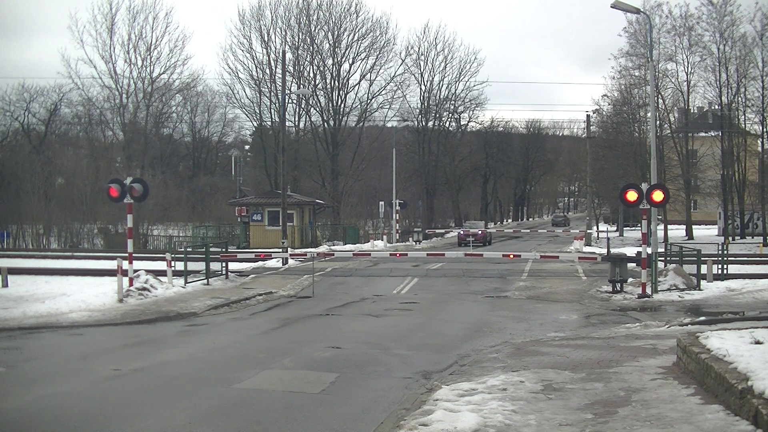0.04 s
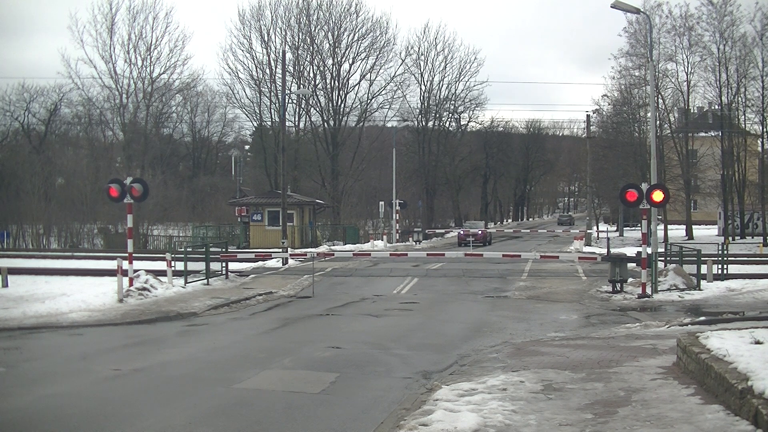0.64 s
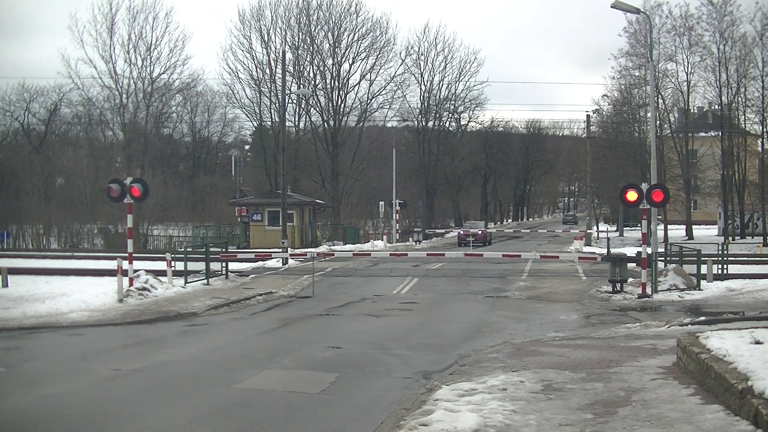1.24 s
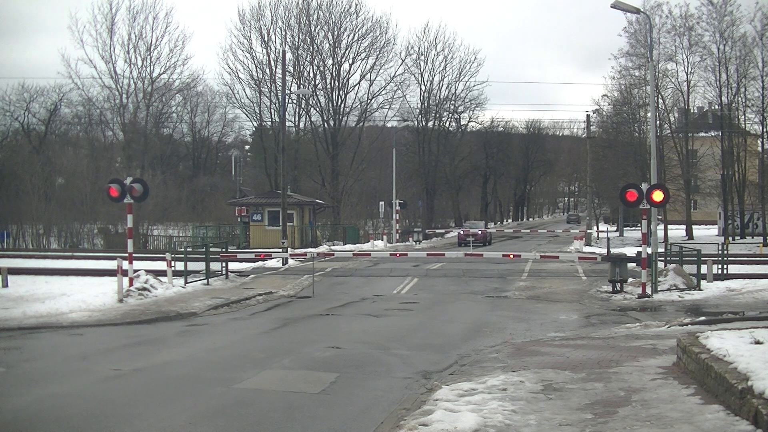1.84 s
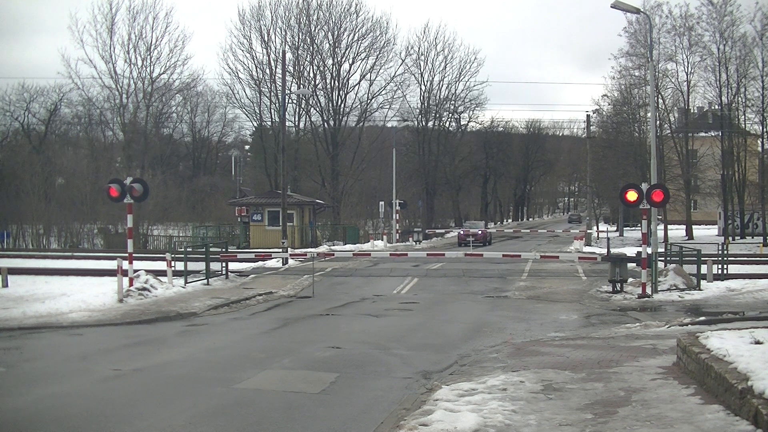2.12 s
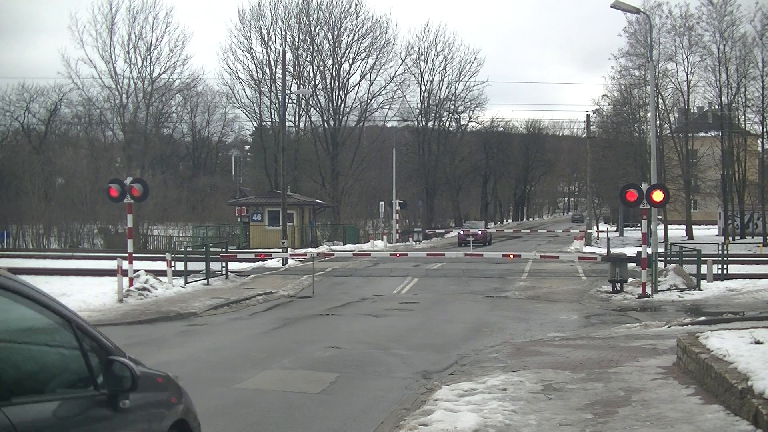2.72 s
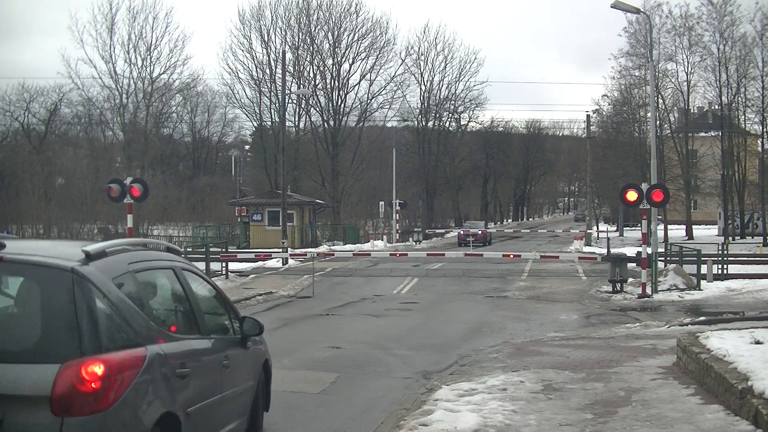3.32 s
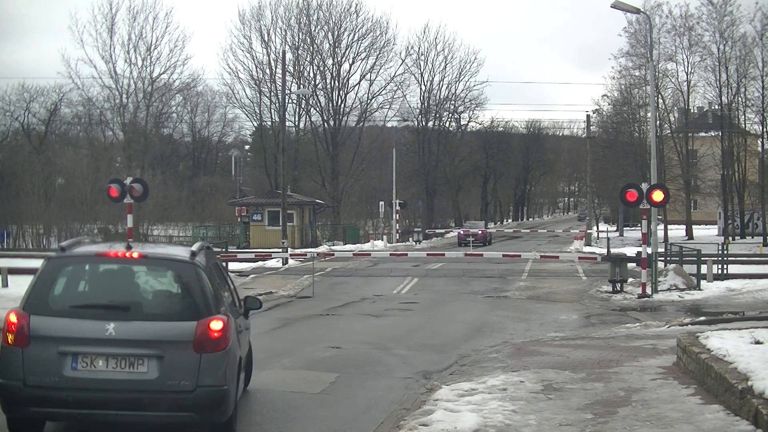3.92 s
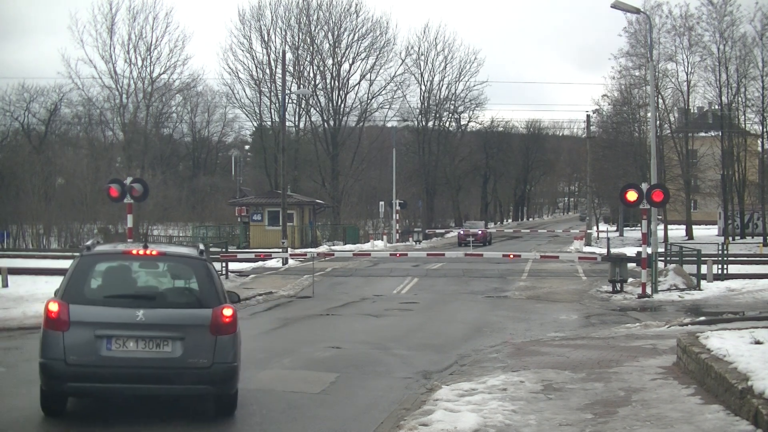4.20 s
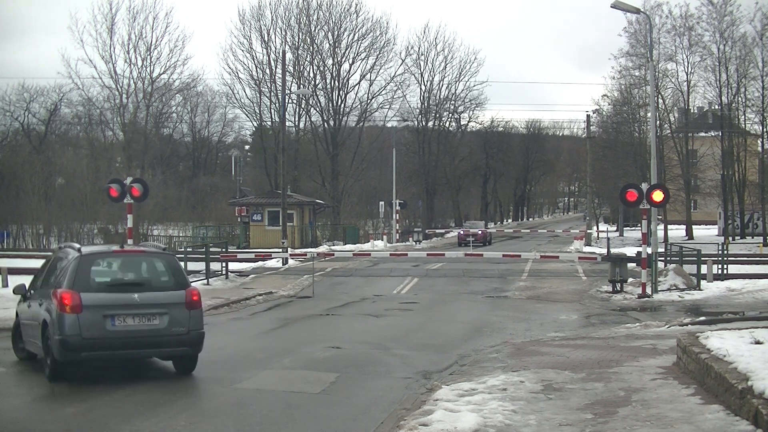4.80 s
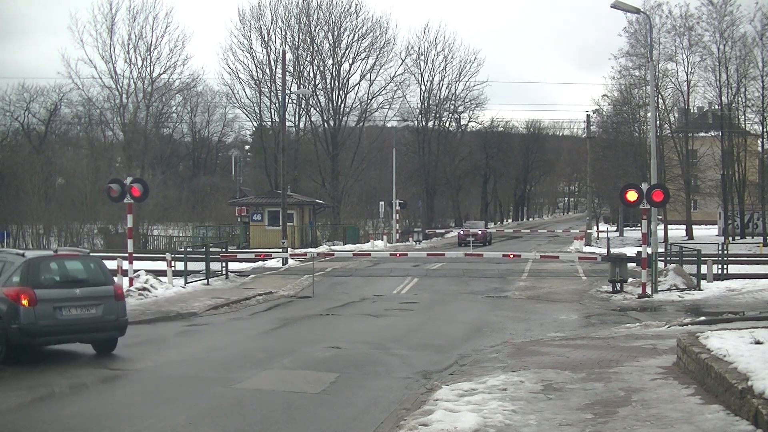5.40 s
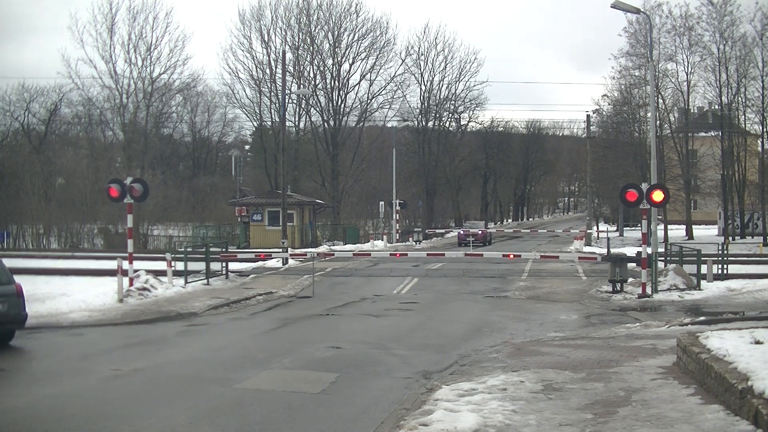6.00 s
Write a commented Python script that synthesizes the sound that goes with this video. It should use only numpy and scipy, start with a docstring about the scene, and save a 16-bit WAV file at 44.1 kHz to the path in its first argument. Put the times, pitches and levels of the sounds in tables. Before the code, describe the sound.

A car approaches from behind on a wet road outdoors, its tyres hissing over a low rumble from the rough asphalt. A faint engine hum sinks in pitch from about half a second. The hiss and fluttering spray swell as the car passes close on the left at around 2 seconds, with a few sharp snaps of grit just afterwards. A hollow tone within the tyre noise falls until about 3.2 seconds, then rises slightly as the car slows and turns away ahead. A wheel slaps through slush at about 3.4 seconds and more softly at 4.1, where more grit cracks. A few faint, high drips tick nearby between 1.7 and 3.2 seconds. The tyre hiss carries on more quietly with scattered small clicks, and near 5.9 seconds comes a sharper snap with a quick cluster of slushy splashes.

```python
"""Tyres roar, hiss and fling spray on a wet road as a car comes from behind, passes close on the left,
slows and turns away ahead. Rough asphalt shakes the tyres, the tread throws off water, and the horn
between tread and road resonates ever lower, then rises a little. Beneath this the engine runs down,
grit snaps, a wheel slaps through slush and a few drops land nearby. The microphone's housing
colours the sound differently from each direction."""
import sys
import numpy as np
from scipy import signal
from scipy.fft import rfft, irfft, next_fast_len
from scipy.io import wavfile
from scipy.ndimage import map_coordinates

SR = 44100
rng = np.random.default_rng(int(sys.argv[2]) if len(sys.argv) > 2 else 0)


def generate_wav(sig):
    """Save sig (samples, or channels by samples) to the path in sys.argv[1] as 16-bit PCM at SR."""
    pcm = np.round(np.clip(np.atleast_2d(sig).T, -1, 1) * 32767).astype(np.int16)
    wavfile.write(sys.argv[1], SR, pcm)


N = 271611

# exhaust hum envelope: time_s, level_db
HUM_LEVEL = [(0, -78), (.25, -71), (.55, -68), (1.02, -75), (1.65, -67), (2.05, -75), (2.7, -98)]
# partials of the exhaust and of the belt-driven parts: firing_multiple, relative_db
HUM_ORDERS = [(1, 4), (2, -9), (3, -2), (4, -1), (5, 3), (6, 4)]
BELT_ORDERS = [(3.93, -1), (4.8, 0), (7.43, -1.5)]
# drops landing nearby: start_s, relative_db, pitch_hz, t60_s
DRIP_TICKS = [(1.725, -27, 12200, .03), (2.705, -28, 12600, 0.053), (3.046, -28, 13400, 0.043),
              (3.236, -24, 9100, .012)]
# stones snapping under the tread: start_s, relative_db, pitch_hz
GRIT_SNAPS = [(.881, -23, 1600), (2.279, -19, 2900), (2.348, -17, 2400), (2.458, -19, 3000),
              (3.046, -23, 1950), (3.206, -21, 2300), (3.411, -17, 3000), (4.1295, -13, 3200),
              (4.1423, -19, 3200), (4.1505, -17, 3100), (4.830, -24, 2600), (4.866, -20, 3800),
              (4.9465, -21, 2700), (5.259, -25, 3900), (5.8835, -17, 3000), (5.8858, -14, 4000)]
# slaps through slush: start_s, level_db, t60_s, brightness_db_per_octave
SLUSH_SLAPS = [(3.377, -28, 0.36, 0), (4.13, -41, 0.097, -4), (4.144, -35, 0.11, -3),
               (5.883, -22, 0.2, 0.5), (5.925, -31, 0.31, -1), (5.957, -28.5, 0.13, -2),
               (5.969, -32, 0.73, -4), (6.077, -30.5, 0.1, -2.5)]
# spectrum of flung slush and stone fragments: frequency_hz, density_db
SPATTER_SPECTRUM = [(40, -60), (150, -22), (450, -16.5), (900, 0.5), (2200, 6), (4200, 10), (5500, -4),
                    (7600, -5), (9500, -16), (11000, -20), (15500, -32)]
# tyre spectrum from each bearing: frequency_hz, density_db
SPECTRUM_BEHIND = [(30, -39), (105, -19), (140, -14), (200, -7.5), (280, 0.5), (390, -4.5), (580, -3),
                   (850, 0.5), (1080, -5), (1500, -1), (2200, 0), (3700, 1), (4600, -3.5), (5600, -5.5),
                   (6500, -9), (7350, -13), (8500, -13.5), (9800, -19.5), (10800, -23), (15500, -31)]
SPECTRUM_BESIDE = [(30, -43), (100, -26), (170, -19), (580, -12.5), (900, -9), (1250, 0.1), (2300, 9),
                   (4100, 2), (4550, -6), (5500, -3), (6700, -7.5), (8000, -17), (9900, -18.5),
                   (10800, -29), (12800, -23.5), (15500, -33)]
SPECTRUM_AHEAD = [(30, -29), (120, -27), (170, -17), (280, -15), (400, -19), (620, -10.5), (1180, -5.5),
                  (1600, -4.5), (2200, 0.5), (3100, -3.5), (4200, 1.5), (4750, -7), (5600, -6.5),
                  (7000, -8.5), (8600, -18), (9800, -17.5), (10900, -27.5), (15500, -30.5)]
# likeness of left and right from each bearing: frequency_hz, coherence
COHERENCE_BEHIND = [(100, 0.95), (400, 0.98), (1150, 1), (2000, 0.48), (3400, 0.32), (5300, 0.29),
                    (6500, 0.5), (9500, 0.57), (11000, 0.22)]
COHERENCE_BESIDE = [(100, .93), (300, .98), (900, .975), (1500, .992), (3300, .965), (5000, .75),
                    (8000, .78), (11000, .6), (15000, .6)]
COHERENCE_AHEAD = [(100, .65), (300, .82), (750, .97), (1300, .995), (2600, .99), (4100, .96), (5200, .45),
                   (6800, .77), (9700, .68), (11000, .15)]
# shading by the housing from each bearing: frequency_hz, left_minus_right_db
BALANCE_BEHIND = [(100, -3), (300, -1.5), (1600, -4.5), (3400, 6), (4600, 2.5), (5500, 5.5), (8400, 8),
                  (9900, -8), (11500, 6), (14000, 2)]
BALANCE_BESIDE = [(300, -1.5), (1500, -.4), (4000, 0), (5000, 2), (6700, 4.5), (8200, 0), (9700, -6),
                  (11200, 0), (14000, -2)]
BALANCE_AHEAD = [(300, -1.5), (1500, -.4), (3000, -.3), (4500, -1.5), (5100, -3), (6000, 3), (7200, 5),
                 (8300, 0), (9700, -7), (11300, -1.5), (14000, -4)]
# phase between the ports from each bearing: frequency_hz, left_lead_rad
PHASE_BEHIND = [(100, 0), (1100, .1), (2800, 1), (4500, .3), (5200, 1.6), (5700, -.6), (6400, .1),
                (9500, -.4), (10800, 2)]
PHASE_BESIDE = [(1000, 0), (4100, .25), (4600, .9), (5400, 1), (7100, -.1), (8300, -.5), (9900, .3),
                (10700, 1.1), (13000, .7)]
PHASE_AHEAD = [(2000, 0), (4700, .1), (5350, 1.1), (6000, .55), (8400, -1), (10000, -.3), (11300, 1.5)]
# resonance between tread and road as the car slows and turns: time_s, centre_hz, boost_db
HORN_RESONANCE = [(0, 3260, 0), (1.0, 3100, 2), (1.7, 2860, 3), (2.55, 2240, -0.5), (3.2, 1470, 4),
                  (3.55, 1760, 4), (3.95, 1900, 1), (4.501, 1950, -1.9), (6.16, 2100, -1.5)]
# notches cut by reflections: behind_hz, ahead_hz, midway_m, glide_m, depth_db, deepest_m, fade_m
REFLECTION_NOTCHES = [(10050, 4040, 0.14, 1.1, 6, -0.34, 1.53), (2300, 590, 0.37, 2.2, 3, 0.46, 5)]
# wetter (+) and drier (-) patches of road: middle_s, half_length_s, gain_db
ROAD_WETNESS = [(.38, 0.11, 1), (.93, 0.18, 1), (2.236, 0.008, 3), (2.282, 0.0059, 2.5), (2.35, .02, 2.5),
                (3.41, 0.027, -1), (4.14, .025, 3), (4.24, 0.1, -1), (4.53, 0.08, -2), (4.79, .07, 1.5),
                (4.95, .025, 2), (5.14, 0.033, 2.5), (5.24, 0.034, -1), (5.6, 0.025, 2)]
# rougher (+) and smoother (-) patches of asphalt: middle_s, half_length_s, gain_db
ROAD_ROUGHNESS = [(.85, 0.38, 3), (1.65, 0.032, 0.5), (2.43, .06, 2.5), (2.87, 0.085, -3.5), (3.15, 1, 4),
                  (4.58, 0.037, -3.5), (5.34, 0.043, 4.5)]

START_M_PER_S, END_M_PER_S = 8, 2.14
BRAKED_S, ABREAST_S = 3.58, 2.035  # braking ends; the car is closest
TIME_S = np.arange(N) / SR


def amp(db):
    """Decibels to amplitude ratio."""
    return 10 ** (np.asarray(db) / 20)


def unit(x):
    """Normalisation to rms 1."""
    return x / np.sqrt(np.mean(x ** 2) + 1e-20)


def bell(x, width):
    """A Gaussian of height 1 around x = 0."""
    return np.exp(-(x / width) ** 2)


def along(points, hz):
    """Interpolation on a logarithmic frequency axis."""
    knots_hz, values = np.transpose(points)
    return np.interp(np.log(hz + 1), np.log(knots_hz + 1), values)


def wobble(rate_hz):
    """Random modulation: a spline through rate_hz knots a second."""
    return map_coordinates(rng.standard_normal(int(N * rate_hz / SR) + 4), [TIME_S * rate_hz])


def filtered(x, response):
    """Linear filtering: the spectrum of x times a frequency response."""
    size = next_fast_len(x.shape[-1] + SR // 8)
    return irfft(rfft(x, size) * response(np.fft.rfftfreq(size, 1 / SR)), size)[..., :x.shape[-1]]


def add(track, start_s, sound):
    """Superposition of a sound on a track."""
    part = track[..., round(start_s * SR):][..., :sound.shape[-1]]
    part += sound[..., :part.shape[-1]]


def drive():
    """Uniform deceleration, then steady rolling: speed in m/s and metres past the microphone."""
    speed = np.interp(TIME_S, [0, BRAKED_S], [START_M_PER_S, END_M_PER_S])
    travelled_m = np.cumsum(speed) / SR
    return speed, travelled_m - np.interp(ABREAST_S, TIME_S, travelled_m)


def pass_by(near_db, fall_db, rear_db, side_m):
    """Spreading and directivity: fall_db less per doubling of distance, rear_db more towards the tail."""
    _, past_m = drive()
    distance_m = np.hypot(past_m, side_m)
    return near_db - fall_db * np.log2(distance_m / side_m) + rear_db * past_m / distance_m


def bearing_weights():
    """Linear crossfade with position: the shares heard from behind, beside and ahead."""
    _, past_m = drive()
    bearing = np.interp(past_m, [-2.2, 1.8, 7.5], [.18, 1, 2])  # 0 behind, 1 beside, 2 ahead
    return [np.maximum(1 - abs(bearing - k), 0) for k in range(3)]


def ports(hz, coherence, balance, phase):
    """Partial coherence: gains of direct and scattered sound at the two microphone ports."""
    angle = np.arccos(np.clip(along(coherence, hz), 0, 1)) / 2
    side = np.array([[1], [-1]])
    shade = amp(side * along(balance, hz) / 2) * np.exp(.5j * side * along(phase, hz))
    shade /= np.abs(shade).mean(0)
    return shade * np.cos(angle), shade * side * np.sin(angle)


def partials(orders, phase):
    """Additive synthesis: sines at multiples of one phase, each wavering in level."""
    return sum(amp(db + 2.3 * wobble(6)) * np.sin(multiple * phase + rng.uniform(0, 2 * np.pi))
               for multiple, db in orders)


def engine(start_hz, lift_s, sag_hz_per_s):
    """Periodic firing: exhaust hum and belt whine sink together once the throttle is lifted."""
    firing_hz = np.clip(start_hz - sag_hz_per_s * (TIME_S - lift_s), start_hz / 2, start_hz)
    phase = 2 * np.pi * np.cumsum(firing_hz * (1 + .0031 * wobble(9.1))) / SR
    hum_db = np.interp(TIME_S, *np.transpose(HUM_LEVEL))
    belt_db = pass_by(near_db=-66, fall_db=.5, rear_db=-9.5, side_m=.81)
    return amp(hum_db) * partials(HUM_ORDERS, phase) + amp(belt_db) * partials(BELT_ORDERS, phase)


def drips(width_hz, gain_db):
    """Drop impact: thin, high ticks of narrow-band noise that decay exponentially."""
    out, t = np.zeros((2, N)), np.arange(SR // 12) / SR
    for start_s, db, pitch_hz, t60_s in DRIP_TICKS:
        ring = filtered(rng.standard_normal((2, len(t))), lambda hz: bell(hz - pitch_hz, width_hz))
        add(out, start_s, unit(ring) * amp(db + gain_db - 60 * t / t60_s))
    return out


def grit(cycles, scatter_db, scatter_t60_s, low_hz):
    """Damped transients: each stone snaps and scatters fragments, too small to radiate bass."""
    out, t = np.zeros(N), np.arange(SR // 16) / SR
    for start_s, db, pitch_hz in GRIT_SNAPS:
        snap = np.sin(2 * np.pi * pitch_hz * t) * t * np.exp(-t * pitch_hz / cycles)
        noise = filtered(rng.standard_normal(len(t)), lambda hz: amp(along(SPATTER_SPECTRUM, hz)))
        fragments = unit(noise) * amp(scatter_db - 60 * t / scatter_t60_s)
        add(out, start_s, amp(db) * (snap / abs(snap).max() + fragments))
    return signal.sosfilt(signal.butter(2, low_hz, "high", fs=SR, output="sos"), out)


def slush(attack_s, spread_db):
    """Incoherent summation: each slap of a wheel raises a sudden cloud of drops that dies away."""
    out, t = np.zeros((2, N)), np.arange(SR // 3) / SR
    image = lambda hz: np.array(ports(hz, COHERENCE_AHEAD, BALANCE_AHEAD, PHASE_AHEAD))
    for start_s, db, t60_s, brightness in SLUSH_SLAPS:
        drops = rng.standard_normal((2, len(t))) * amp(spread_db * rng.standard_normal(len(t)))
        colour = lambda hz: amp(along(SPATTER_SPECTRUM, hz) + brightness * np.log2((hz + 1) / SR))
        cloud = unit(filtered(drops[:, None], lambda hz: colour(hz) * image(hz)).sum(0))
        add(out, start_s, cloud * amp(db - 60 * t / t60_s) * (1 - np.exp(-t / attack_s)))
    return out


def patches(rows):
    """Amplitude modulation by the road: a swell or dip in dB as the wheels cross each patch."""
    return sum(db * bell(TIME_S - middle_s, half_s) for middle_s, half_s, db in rows)


def droplets(per_s, share, t60_s=.011):
    """Shot noise: spatters of uneven size carry a share of the power, a smooth rush the rest."""
    sizes = amp(3 * np.minimum(rng.exponential(size=N), 2 * np.pi))
    impacts = sizes * (rng.random(N) < per_s / SR)
    decay = amp(-60 * np.arange(SR // 20) / SR / t60_s)
    power = abs(signal.fftconvolve(impacts ** 2, decay ** 2)[:N])
    spatter = np.sqrt(power) * rng.standard_normal(N)
    return np.sqrt(share) * unit(spatter) + np.sqrt(1 - share) * rng.standard_normal(N)


def passing_band(source, low_hz, high_hz):
    """Directional filtering by the housing: a noise band's colour and width follow the car's bearing."""
    size = next_fast_len(N + SR // 8)
    hz = np.fft.rfftfreq(size, 1 / SR)
    direct, scattered = rfft([source, rng.standard_normal(N)], size)
    band = 1 / np.sqrt((1 + (low_hz / (hz + 1)) ** 10) * (1 + (hz / high_hz) ** 10))
    bearings = [(SPECTRUM_BEHIND, COHERENCE_BEHIND, BALANCE_BEHIND, PHASE_BEHIND),
                (SPECTRUM_BESIDE, COHERENCE_BESIDE, BALANCE_BESIDE, PHASE_BESIDE),
                (SPECTRUM_AHEAD, COHERENCE_AHEAD, BALANCE_AHEAD, PHASE_AHEAD)]
    out = np.zeros((2, N))
    for weight, (colour, *image) in zip(bearing_weights(), bearings):
        direct_gain, scattered_gain = ports(hz, *image)
        at_ports = direct * direct_gain + scattered * scattered_gain
        pair = irfft(at_ports * band * amp(along(colour, hz)), size)[:, :N]
        out += weight * pair / pair.mean(0).std()
    return out


def horn_and_reflections(x, horn_octaves, notch_octaves):
    """Resonance and interference: the tread's horn adds a moving peak, reflections cut falling notches."""
    hz, t, spectra = signal.stft(x, SR, nperseg=1024)
    log_hz = np.log2(hz[:, None] + 1)
    past_m = np.interp(t, TIME_S, drive()[1])
    time_s, centre_hz, boost_db = np.transpose(HORN_RESONANCE)
    octaves = log_hz - np.log2(np.interp(t, time_s, centre_hz))
    hollow_above = .79 * bell(octaves - .61, horn_octaves)
    db = np.interp(t, time_s, boost_db) * (bell(octaves, horn_octaves) - hollow_above)
    for behind_hz, ahead_hz, midway_m, glide_m, depth_db, deepest_m, fade_m in REFLECTION_NOTCHES:
        fallen = (1 + np.tanh((past_m - midway_m) / glide_m)) / 2
        octaves = log_hz - np.log2(behind_hz * (ahead_hz / behind_hz) ** fallen)
        crest_below = .38 * bell(octaves + .46, notch_octaves)
        db += depth_db * bell(past_m - deepest_m, fade_m) * (crest_below - bell(octaves, notch_octaves))
    return signal.istft(spectra * amp(db), SR, nperseg=1024)[1][:, :N]


def tread_whine(start_hz, width_hz):
    """Quasi-periodic impacts: unevenly spaced tread blocks give a fuzzy pitch proportional to speed."""
    speed, _ = drive()
    phase = 2 * np.pi * np.cumsum(start_hz * speed / START_M_PER_S) / SR
    fuzz = filtered(rng.standard_normal((2, N)), lambda hz: bell(hz, width_hz / 2))
    whine = unit(fuzz[0] * np.cos(phase) + fuzz[1] * np.sin(phase))
    return amp(pass_by(near_db=-54.5, fall_db=1.5, rear_db=-7.5, side_m=3)) * whine


def tyre_roar():
    """Forced vibration: rough asphalt shakes the tyre carcass into low noise."""
    carcass = passing_band(rng.standard_normal(N), low_hz=20, high_hz=1000)
    level_db = pass_by(near_db=-40.5, fall_db=5, rear_db=-2.5, side_m=2.09) + patches(ROAD_ROUGHNESS)
    return amp(level_db + .38 * wobble(13)) * carcass


def spray():
    """Independent impacts: large and small flung drops make two bands of fluttering treble."""
    coarse = passing_band(droplets(per_s=3000, share=.58), low_hz=4600, high_hz=9000)
    fine = passing_band(droplets(per_s=2500, share=.68), low_hz=9000, high_hz=20000)
    _, past_m = drive()
    _, beside, _ = bearing_weights()
    shadow_db = 2.4 * bell(past_m - 4.06, .45)  # the car's flank briefly hides part of the spray
    fine_db = -10.5 + .79 * beside  # the finest spray carries best when the wheels are near
    level_db = pass_by(near_db=-30.5, fall_db=7, rear_db=1.37, side_m=1.68) + patches(ROAD_WETNESS)
    return amp(level_db - shadow_db + .32 * wobble(22.3)) * (coarse + amp(fine_db) * fine)


def wet_hiss():
    """Shot noise of water under the tread, fluttering as the road is wetter or drier."""
    water = passing_band(droplets(per_s=3000, share=.42), low_hz=1000, high_hz=4600)
    level_db = pass_by(near_db=-29, fall_db=4, rear_db=2.5, side_m=2.13) + patches(ROAD_WETNESS)
    return amp(level_db + .3 * wobble(22.73)) * water


def tyres():
    """Rolling noise: roar, hiss and spray shaped by horn and reflections, plus the tread's whine."""
    rolling = tyre_roar() + wet_hiss() + spray()
    shaped = horn_and_reflections(rolling, horn_octaves=.17, notch_octaves=.25)
    return shaped + tread_whine(start_hz=1598, width_hz=320)


def scene():
    """Superposition of the car's sources in the open air."""
    stones = grit(cycles=.82, scatter_db=-27, scatter_t60_s=.038, low_hz=815)
    motor = engine(start_hz=62.6, lift_s=.55, sag_hz_per_s=12.8)
    ticks = drips(width_hz=1100, gain_db=-11.5)
    slaps = slush(attack_s=.0004, spread_db=3)
    return motor + ticks + stones + slaps + tyres()


def record(dry):
    """Band limiting: an ideal low-pass removes the highest treble."""
    return filtered(dry, lambda hz: hz < 15850)


dry = scene()
out = record(dry)
generate_wav(out)
```